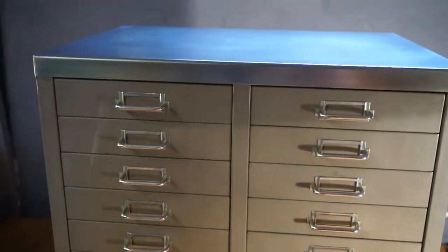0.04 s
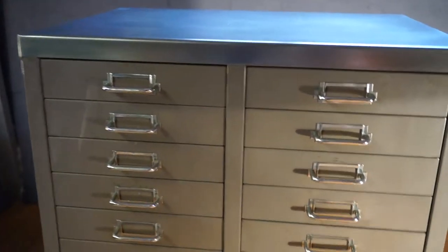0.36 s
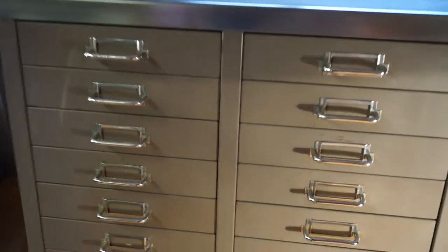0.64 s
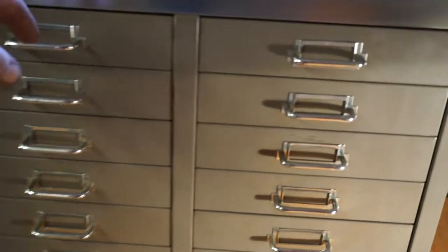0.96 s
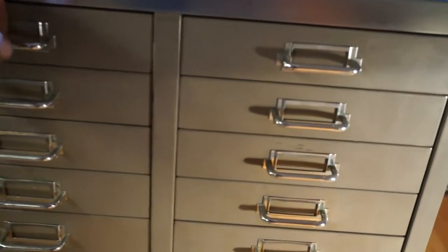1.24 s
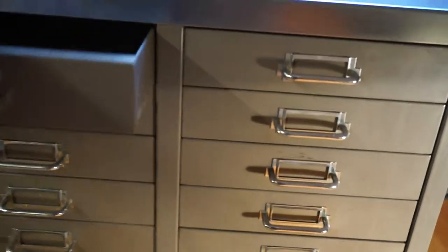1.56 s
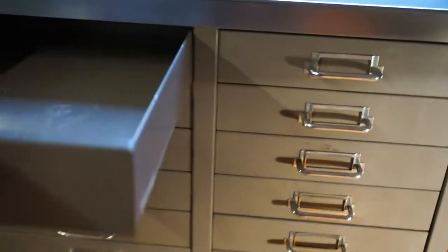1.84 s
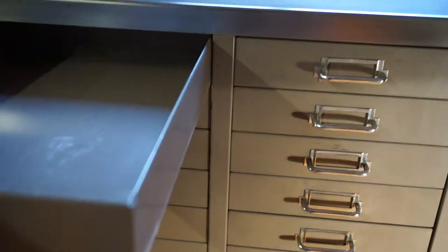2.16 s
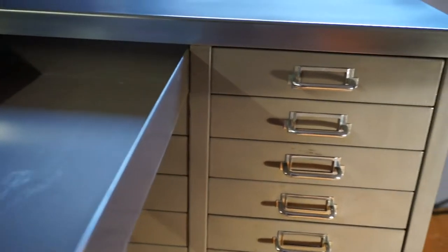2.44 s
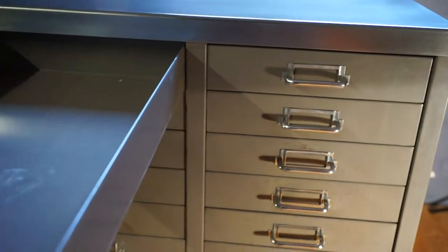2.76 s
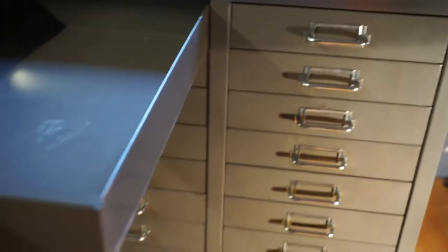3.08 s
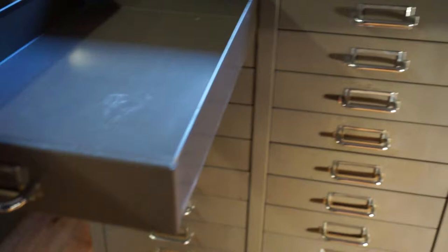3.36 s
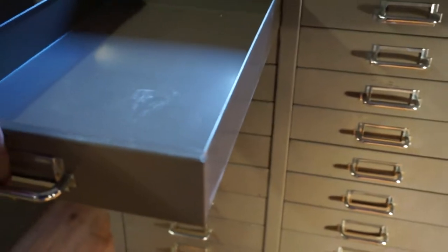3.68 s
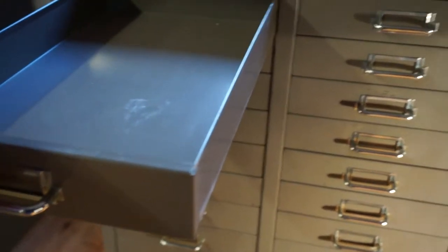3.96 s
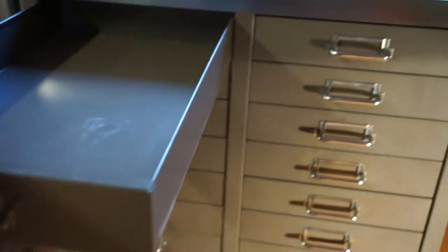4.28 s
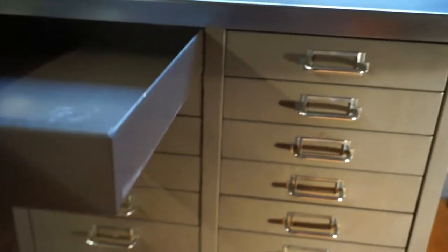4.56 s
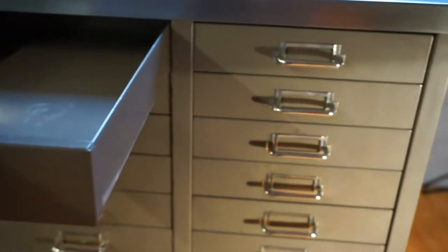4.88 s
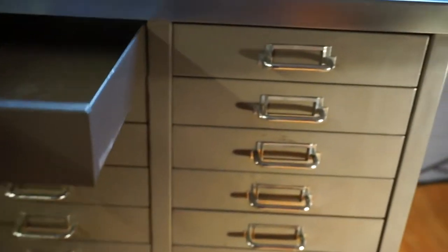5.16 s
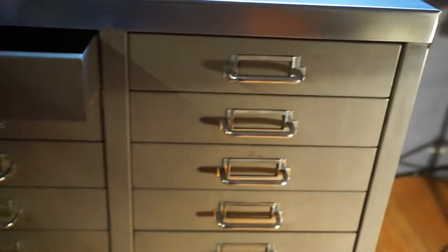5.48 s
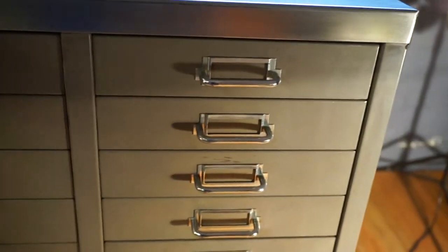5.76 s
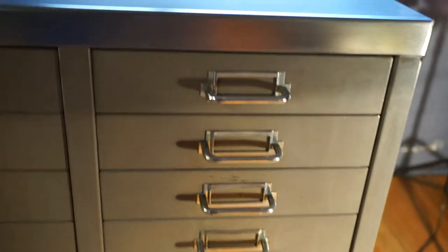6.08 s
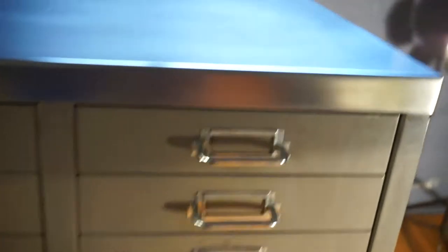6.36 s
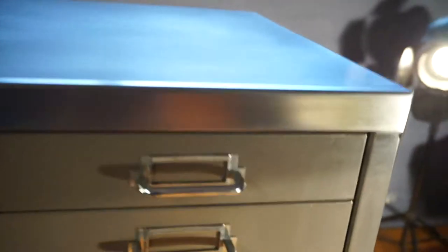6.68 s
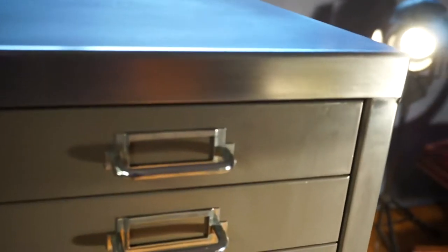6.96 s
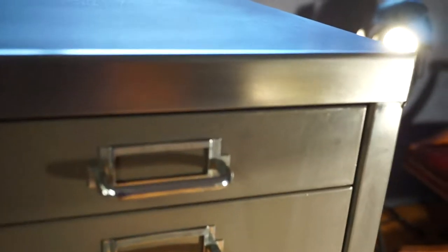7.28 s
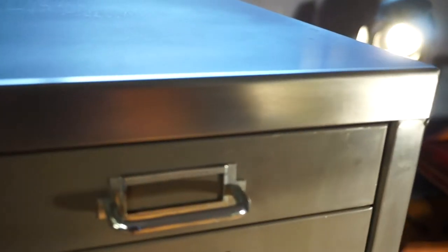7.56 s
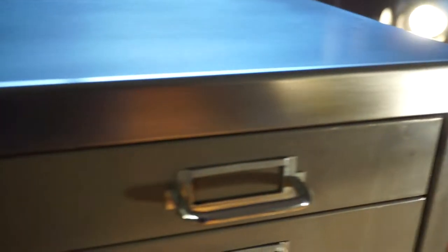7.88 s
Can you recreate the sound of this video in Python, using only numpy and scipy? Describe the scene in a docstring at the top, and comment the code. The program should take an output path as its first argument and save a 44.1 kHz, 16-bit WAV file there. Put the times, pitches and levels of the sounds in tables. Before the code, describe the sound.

Over a faint hush in a small room, fingers tick on a hand-held microphone, and a foot shifts softly on floorboards at about 0.5 seconds. A handle clinks lightly near 1.2 seconds. From 1.4 seconds a shallow steel filing cabinet drawer scrapes open, close and slightly left, juddering around 2 seconds and groaning on its runners. The pull fades with a faint, thin hiss by about 3.2 seconds. After a short pause, the drawer is pushed back from 4.1 seconds, louder now, groaning and catching with several ringing metal knocks between 4.2 and 5.1 seconds. It slides on more smoothly and slams shut at 5.7 seconds with a sharp snap, a hollow thud and a small bounce. The steel rings briefly. Fingers tick and rub on the microphone again near 6.8 seconds, and a very faint distant whirr lingers until about 8 seconds.

```python
"""Over a faint room hush, fingers tick and rub on a hand-held camera, and a foot shifts on floorboards.
A shallow steel drawer is pulled out of a filing cabinet, pushed back, catches and slams home.
Sliding friction and impacts excite the modes of the thin tray, its walls and the hollow cabinet;
stick-slip on the runners makes the tray groan and judder, and the steel rings on in a small room.
A thin hiss is heard as the pull ends. Last, a faint whirr comes up and the fingers tick again."""
import sys
import numpy as np
from scipy import signal
from scipy.fft import rfft, irfft
from scipy.io import wavfile
from scipy.ndimage import uniform_filter1d

SR = 44100
rng = np.random.default_rng(int(sys.argv[2]) if len(sys.argv) > 2 else 0)


def wav_record(signal):
    """Record a signal, one row per channel, as 16-bit PCM in the file named by sys.argv[1]."""
    frames = np.transpose(np.atleast_2d(signal))
    bounded = np.clip(frames, -1, 1)
    # unit amplitude maps onto the largest positive 16-bit level
    quanta = np.round(bounded * 32767).astype(np.int16)
    wavfile.write(sys.argv[1], SR, quanta)


N = 349713
TIME = np.arange(N) / SR
FFT_SIZE = 5 * 2 ** 14
FREQ = np.maximum(np.arange(FFT_SIZE // 2 + 1) * SR / FFT_SIZE, 1)

# broad spectral envelopes of the sources: frequency_hz, gain_db
HUSH_COLOUR = [(15, -25), (25, 0.5), (79, -10), (230, -4.5), (400, -10.5), (826, -14.5), (2800, -18.5),
               (4300, -24), (15500, -29.5)]
CLICK_COLOUR = [(100, -47), (1200, -10), (1700, -11.5), (2100, 1.5), (4000, -0.5), (6500, -10.5),
                (8000, -10.5), (16000, -15)]
DULL_KNOCK_COLOUR = [(60, -9), (200, -2), (1250, -1), (3000, -6), (5000, -26), (15000, -24)]
SKIN_COLOUR = [(100, 13), (1200, -9), (2500, 4), (5000, -1), (11000, -1.5), (16000, -7)]
BOARD_COLOUR = [(40, -40), (130, 3), (350, 6), (1000, -15.5), (10000, -65)]
SOLE_COLOUR = [(100, -17), (700, 5), (2800, -4.5), (5000, -17), (15000, -26)]
FREE_TRAY_COLOUR = [(40, -42.5), (130, -17), (260, -5), (380, -3), (650, 6.5), (820, -4), (1050, 5),
                    (1500, -7), (2150, -7.5), (3300, -34.5), (9000, -52.5), (15000, -46.5)]
SHUT_TRAY_COLOUR = [(40, -35), (130, -10), (300, 3.5), (1000, 3.5), (2000, -12), (3300, -28), (9000, -53)]
WALL_COLOUR = [(60, -27.5), (300, -9.5), (800, -9.5), (1400, 6.5), (2300, 0.5), (3700, -9.5), (5000, -14.5),
               (7000, -17), (9500, -21.5), (13000, -20), (16000, -29.5)]
SHELL_COLOUR = [(25, -28), (50, -20), (75, -6.5), (150, 2.5), (260, 1.5), (400, -3), (700, -12.5),
                (3000, -34), (12000, -70)]
HISS_COLOUR = [(60, -13), (170, 16.5), (700, 13), (1500, 3), (6000, -12), (15000, -14.5)]
# resonance peaks on those envelopes: centre_hz, width_hz, lift_db
CASE_PEAKS = [(2880, 370, 8), (6620, 540, 13.5)]
SKIN_PEAKS = [(6600, 550, 11)]
TRAY_PEAKS = [(308, 53, 15.5), (505, 40, 10), (603.7, 68, 7.5), (723.6, 22, 15), (943, 100, 9.5),
              (1191, 45, 5), (1352, 260, 9.5), (1554, 180, 10.5)]
WALL_PEAKS = [(564, 140, 9), (1057, 60, 12.5), (1401, 140, 9.5), (1660, 42, 4), (2950, 340, 6),
              (4650, 710, 7.5)]  # with the drawer half out
SHELL_PEAKS = [(95.3, 7.9, 9), (141, 19, 6), (166.3, 18, 7.4), (219, 40, 3.5), (295, 66, 6.7)]
HISS_PEAKS = [(4740, 1200, 18.5)]
# freely decaying modes: pitch_hz, t60_s, relative_db
HANDLE_MODES = [(1596, 0.035, 3.5), (2224, 0.06, -3), (4230, 0.012, -4.5)]
TRAY_BOTTOM_MODES = [(304.3, 0.045, -7), (639.5, 0.091, -2), (693, 0.13, 3), (696, 0.066, 1),
                     (790, 0.16, -7), (870, 0.018, -4.5)]
ROCK_MODES = [(93.7, 0.57, 0)]
FRONT_MODES = [(200, 0.022, 0)]
WHIRR_MODES = [(1044, .025, 0)]

# fingers tick on the camera: start_s, click_db, knock_db
FINGER_TICKS = [(.098, -14, -19.5), (0.11, -27, -11.5), (0.160, -31, -34), (0.3145, -11, -53),
                (0.353, -33, -59), (6.727, -41, -59), (6.781, -13, -36), (6.788, -17, -38),
                (6.803, -37, -21)]
# fingers rub on it: peak_s, rise_s, fall_s, level_db
FINGER_RUBS = [(0.101, 0.087, 0.0097, -58.5), (6.746, 0.021, 0.049, -50)]
# a foot shifts: start_s, thump_db, scuff_db, decay_s
FOOT_SHIFTS = [(0.477, -19.5, -56, 0.001), (0.554, -30, -19, 0.019), (0.59, -21.5, -19, 0.086),
               (0.631, -10.5, -33, 0.005), (0.858, -29.5, -36, 0.28)]
# the handle is taken and pulled: start_s, level_db
HANDLE_CLINKS = [(1.14, -31.5), (1.259, -19.5)]
# blows on the drawer: start_s, tray_db, edge_db, snap_over_edge_db, shell_db, decay_s
DRAWER_KNOCKS = [(1.262, -31, -47, 3, -7, 0.08), (4.226, 5, -9.5, 5, -10.5, 0.013),
                 (4.268, -2, -19.5, 9, -1, 0.011), (4.609, 9.5, -1.5, 4, -9.5, 0.0034),
                 (4.632, 8, -3.5, -20.5, 2, 0.016), (4.661, 7, -3, -9.5, -8.5, 0.0042),
                 (4.768, 16.5, 4.5, -20, 2.5, 0.011), (4.987, 9.5, 4, -2, 3.5, 0.008),
                 (5.021, 12.5, 2.5, -4, -7, 0.006), (5.066, 5.5, -7.5, -13, -8.5, 0.0068),
                 (5.734, -10, -9, 16.5, 7, 0.0041), (5.740, 3, -1, -11, 8.5, 0.0086),
                 (5.749, 8.5, 2, -14, 12, 0.012), (5.776, 7.5, -4.5, -16, 10, 0.06)]
# strokes of the hand, out and then in: peak_s, rise_s, fall_s, rub_db, scrape_db, rumble_db
HAND_STROKES = [(1.5, 0.12, 0.098, -35, -39.5, -44), (1.8, 0.32, 0.22, -33, -28.5, -44),
                (1.81, 0.071, 0.026, -28, -39, -47), (2.38, 0.41, 0.18, -35.5, -45, -50),
                (4.11, 0.04, 0.075, -46, -65, -60), (4.21, 0.12, 0.13, -33, -48.5, -42),
                (4.74, 0.25, 0.12, -30, -41, -34), (5.11, 0.13, 0.18, -30, -46.5, -37),
                (5.42, 0.36, 0.33, -39, -37.5, -46)]
# how far the drawer is out: time_s, travel_share
DRAWER_TRAVEL = [(1.35, 0), (2.0, .7), (2.7, 1), (4.15, 1), (5.734, 0)]
# slow runners bow the tray: peak_s, rise_s, fall_s, hum_db, tone_db, pitch_hz
TRAY_GROANS = [(1.52, .07, 0.035, -59, -39, 714.4), (2.01, 0.044, 0.13, -46.5, -36.5, 722),
               (2.4, 0.26, 0.14, -44, -39.5, 691), (2.73, 0.2, .16, -66, -56.5, 673),
               (4.17, .12, .06, -39.5, -42.5, 731), (4.459, 0.042, 0.14, -33.5, -36.5, 719.8),
               (4.645, .04, .04, -31, -26, 709.5), (4.725, .03, 0.027, -25, -29.5, 696),
               (5.0, 0.02, 0.033, -23, -44, 712), (5.5, .07, 0.074, -65.5, -40, 723)]
# a dry runner catches: start_s, level_db, decay_s
RUNNER_JUDDERS = [(1.908, 4, 0.0075), (1.967, 8, 0.012), (2.025, -4.5, 0.059), (4.144, -1, 0.03),
                  (4.432, -2.5, .04), (4.526, 1.5, 0.018), (4.585, 3.5, 0.016), (4.63, 8, 0.022),
                  (4.717, 2.5, 0.021)]
# swells of a faint hiss as the pull ends: peak_s, rise_s, fall_s, level_db
FAINT_HISS = [(2.5, 0.24, 0.15, -52.5), (2.8, 0.56, 0.16, -55), (3.19, 0.36, 0.083, -63)]
# the cabinet rocks on the floor: start_s, level_db
CABINET_ROCKS = [(4.29, -6), (4.86, -9)]
# the drawer front hits the frame and bounces: start_s, level_db
FRONT_SLAMS = [(5.734, 4), (5.749, 2.5), (5.853, -2)]
# ring time of the steel in the room: frequency_hz, t60_s
RING_TIMES = [(90, 2.44), (290, 1.38), (520, 0.92), (1100, 0.59), (3000, 0.68), (15000, 0.28)]
# the cabinet stands to the left: frequency_hz, left_over_right_db, side_over_mid_db
STEREO_IMAGE = [(100, .3, -31), (350, .9, -21), (700, 2, -16), (1300, 4.8, -7), (5000, 4.5, -2),
                (9000, .5, -3), (13000, -2, -3)]


def undb(db):
    """Amplitude ratio of a level in decibels."""
    return 10 ** (np.asarray(db) / 20)


def curve(table, hz=FREQ, column=1):
    """Interpolation of one column on a logarithmic frequency axis."""
    rows = np.array(table)
    return np.interp(np.log(hz), np.log(rows[:, 0]), rows[:, column])


def minimum_phase(db):
    """Causality: a spectrum with these gains in which nothing sounds before its cause."""
    cepstrum = irfft(np.log(undb(db)))
    cepstrum[1:FFT_SIZE // 2] *= 2
    cepstrum[FFT_SIZE // 2 + 1:] = 0
    return np.exp(rfft(cepstrum))


def body(colour, peaks=()):
    """Resonance: a unit-energy impulse response whose broad envelope is lifted by peaks."""
    lifts_db = sum(lift / (1 + (2 * (FREQ - hz) / width) ** 2) for hz, width, lift in peaks)
    response = irfft(minimum_phase(curve(colour) + lifts_db))
    return response / np.linalg.norm(response)


def ringing(modes):
    """Modal superposition: damped cosines add to a unit-energy impulse response."""
    t = np.arange(FFT_SIZE // 2) / SR
    response = sum(undb(db - 60 * t / t60) * np.cos(2 * np.pi * hz * t) for hz, t60, db in modes)
    return response / np.linalg.norm(response)


def through(x, response):
    """Convolution of an excitation with an impulse response, channel by channel."""
    return signal.fftconvolve(np.atleast_2d(x), np.atleast_2d(response), axes=1)[:, :N]


def filtered(x, order, cutoff_hz, kind="low"):
    """Maximally flat low-pass or high-pass filtering."""
    return signal.sosfilt(signal.butter(order, cutoff_hz, kind, fs=SR, output="sos"), x)


def wander(rate_hz):
    """Band-limited random fluctuation with a spread near 1."""
    knots = rng.standard_normal(4096)
    fine = signal.resample(knots, 8 * len(knots))
    return np.interp(8 * TIME * rate_hz, np.arange(len(fine)), fine)


def swell(peak_s, rise_s, fall_s, db):
    """Asymmetric bell envelope, 10 dB down at rise_s before its peak and fall_s after it."""
    away = (TIME - peak_s) / np.where(TIME < peak_s, rise_s, fall_s)
    return undb(db - 10 * np.minimum(away ** 2, 20))


def shot_noise(pulses_per_s, spread_db, flutter_hz, flutter_db):
    """Shot noise: random, uneven impulses whose level flutters; in friction, each is one tiny slip."""
    pulses = (rng.random(N) < pulses_per_s / SR) * rng.choice([-1, 1], N)
    pulses = pulses * undb(spread_db * rng.standard_normal(N))
    pulses *= undb(flutter_db * wander(flutter_hz))
    return pulses / np.std(pulses)


def blows(starts_s, levels_db, decays_s, contact):
    """Impact forces: an impulse, weighted by contact, and then an exponentially dying rattle."""
    force = np.zeros(N + FFT_SIZE)
    t = np.arange(FFT_SIZE // 8) / SR
    for start_s, db, decay_s in zip(starts_s, levels_db, decays_s):
        push = rng.standard_normal(len(t)) * np.exp(-t / decay_s)
        push /= np.linalg.norm(push)
        push[0] += contact
        start = int(start_s * SR)
        force[start:start + len(t)] += undb(db) * push / np.linalg.norm(push)
    return force[:N]


def struck(events, modes):
    """Free vibration after clean blows, softened from an octave above the highest mode."""
    start_s, db = np.transpose(events)
    taps = np.zeros(N)
    taps[(start_s * SR).astype(int)] = undb(db)
    return through(filtered(taps, 2, 2 * modes[-1][0]), ringing(modes))


def room_hush(level_db=-66.5, coherent_below_hz=217):
    """Diffuse field: faint room noise, alike on both sides in the bass only."""
    mid, side = through(rng.standard_normal((2, N)), body(HUSH_COLOUR))
    side = filtered(side, 1, coherent_below_hz, "high")
    return np.array([mid + side, mid - side]) * undb(level_db + 0.31 * wander(0.19))


def fingers(pan_db=8, decay_s=0.002):
    """Structure-borne sound: ticks and squeaky rubs on the camera's case, near the left microphone."""
    start_s, click_db, knock_db = np.transpose(FINGER_TICKS)
    decays_s = np.full(len(start_s), decay_s)
    touch = sum(swell(*rub) for rub in FINGER_RUBS)
    channels = []
    for side in (1, -1):
        taps = blows(start_s, click_db, decays_s, contact=side * 0.69)
        clicks = through(taps, body(CLICK_COLOUR, CASE_PEAKS))
        slips = shot_noise(6000, spread_db=4, flutter_hz=200, flutter_db=2)
        squeaks = through(touch * slips, body(SKIN_COLOUR, SKIN_PEAKS))
        knocks = through(blows(start_s, knock_db, 2 * decays_s, contact=0.27), body(DULL_KNOCK_COLOUR))
        channels.append((clicks + squeaks) * undb(side * pan_db / 2) + knocks)
    return np.vstack(channels)


def foot():
    """Impact and friction: the floorboards thump softly as a sole scuffs them."""
    start_s, thump_db, scuff_db, decay_s = np.transpose(FOOT_SHIFTS)
    thumps = through(blows(start_s, thump_db, decay_s, contact=0.47), body(BOARD_COLOUR))
    scuffs = through(blows(start_s, scuff_db, decay_s, contact=0.19), body(SOLE_COLOUR))
    return thumps + scuffs


def handle():
    """Modal ringing: the handle clinks as it is taken and pulled."""
    return struck(HANDLE_CLINKS, HANDLE_MODES)


def knocking(snap_hz=6360):
    """Impact forces on tray, edge and shell; bare steel on steel gives the snap above snap_hz."""
    start_s, tray_db, edge_db, snap_db, shell_db, decay_s = np.transpose(DRAWER_KNOCKS)
    edge = filtered(blows(start_s, edge_db, decay_s, contact=0.53), 3, snap_hz)
    snap = filtered(blows(start_s, edge_db + snap_db, decay_s, contact=0.36), 3, snap_hz, "high")
    tray = blows(start_s, tray_db, decay_s, contact=0.27)
    shell = blows(start_s, shell_db, decay_s, contact=0.99)
    return np.array([tray, edge + snap, shell])


def sliding(chatter_hz=77, chatter_db=4.5, grip_hz=14, grip_db=1.23, rumble_lag_s=0.053):
    """Sliding friction: unevenly gripping runners rub the tray, scrape its edge and shake the shell."""
    strokes = [[swell(s, rise, fall, rub_db), swell(s, rise, fall, scrape_db),
                swell(s + rumble_lag_s, rise, fall, rumble_db)]
               for s, rise, fall, rub_db, scrape_db, rumble_db in HAND_STROKES]
    rub, scrape, rumble = np.linalg.norm(strokes, axis=0)  # overlapping strokes add in power
    cycles = np.cumsum(chatter_hz * (1 + .12 * wander(grip_hz))) / SR
    chatter = undb(chatter_db * (1 - 2 * (cycles % 1)))  # each slip starts hard and dies away
    grip = undb(grip_db * wander(grip_hz)) * chatter / np.sqrt(np.mean(chatter ** 2))
    tray = rub * shot_noise(2500, spread_db=6, flutter_hz=69.3, flutter_db=0)
    edge = scrape * shot_noise(7000, spread_db=5.5, flutter_hz=93.36, flutter_db=2.5)
    shell = rumble * shot_noise(1500, spread_db=0.5, flutter_hz=31.4, flutter_db=4)
    return grip * np.array([tray, edge, shell])


def drawer(positions=5, free_travel=0.38, wall_rise=0.092):
    """Forced vibration of tray, walls and shell; inside free_travel the cabinet damps tray and walls."""
    tray, edge, shell = sliding() + knocking()
    travel = np.interp(TIME, *np.transpose(DRAWER_TRAVEL))
    free = np.clip(travel / free_travel, 0, 1)
    sound = through(tray * free, body(FREE_TRAY_COLOUR, TRAY_PEAKS))
    sound += through(tray * (1 - free), body(SHUT_TRAY_COLOUR))
    for place in np.linspace(0, 1, positions):
        crossfade = np.maximum(1 - abs(travel - place) * (positions - 1), 0)
        lift_share = np.interp(place, [0, free_travel], [.6, 1])
        tuning = 1 + wall_rise * (place - .5)  # the wall modes rise as the drawer comes out
        peaks = [(hz * tuning, width, lift_share * lift) for hz, width, lift in WALL_PEAKS]
        sound += through(edge * crossfade, body(WALL_COLOUR, peaks))
    return sound + through(shell, body(SHELL_COLOUR, SHELL_PEAKS))


def bowed(hz, wander_share=.045, flutter_db=5, flutter_hz=95):
    """Self-sustained oscillation: stick-slip holds one tone whose pitch and strength flutter."""
    cycles = np.cumsum(hz * (1 + wander_share * wander(flutter_hz))) / SR
    tone = np.sin(2 * np.pi * cycles) * undb(flutter_db * wander(flutter_hz))
    return tone / np.std(tone)


def groan(hum_hz=309):
    """Frictional bowing: at a crawl the tray hums in its lowest mode and sings a gliding tone."""
    hum = sum(swell(s, rise, fall, db) for s, rise, fall, db, _, _ in TRAY_GROANS)
    tone = sum(swell(s, rise, fall, db) for s, rise, fall, _, db, _ in TRAY_GROANS)
    peak_s, *_, pitch_hz = np.transpose(TRAY_GROANS)
    return hum * bowed(hum_hz) + tone * bowed(np.interp(TIME, peak_s, pitch_hz))


def judder(slip_hz=69.82, gap_spread=.2, spread_db=2, count=24):
    """Stick-slip: each catch sets off a dying train of uneven jerks that ring the tray bottom."""
    jerks = np.zeros(N)
    for start_s, db, decay_s in RUNNER_JUDDERS:
        gaps, sizes = rng.standard_normal((2, count))
        delays_s = np.cumsum(np.exp(gap_spread * gaps) / slip_hz)
        delays_s -= delays_s[0]
        strengths = undb(db - spread_db * sizes) * np.exp(-delays_s / decay_s)
        jerks[((start_s + delays_s) * SR).astype(int)] += strengths
    softened = filtered(jerks, 2, cutoff_hz=1260)  # a slip takes a moment
    return through(softened, ringing(TRAY_BOTTOM_MODES))


def faint_hiss():
    """Filtered noise: a faint, thin, breath-like hiss near 5 kHz as the pull ends."""
    noise = shot_noise(12000, spread_db=2, flutter_hz=90, flutter_db=1)
    envelope = np.linalg.norm([swell(*row) for row in FAINT_HISS], axis=0)
    return through(envelope * noise, body(HISS_COLOUR, HISS_PEAKS))


def cabinet_bass(hum_hz=177.6):
    """Low modes of the cabinet: it hums briefly while the drawer rests, rocks, and takes the slam."""
    envelope = swell(peak_s=3.43, rise_s=.08, fall_s=.11, db=-65)
    hum = envelope * np.sqrt(2) * np.sin(2 * np.pi * hum_hz * TIME)
    return hum + struck(CABINET_ROCKS, ROCK_MODES) + struck(FRONT_SLAMS, FRONT_MODES)


def whirr():
    """Narrow-band noise: a faint, distant whirr comes up once the cabinet is still."""
    envelope = swell(peak_s=7.6, rise_s=1.16, fall_s=7, db=-71.5)
    return through(envelope * rng.standard_normal((2, N)), ringing(WHIRR_MODES))


def whitened(response):
    """Whitening: the spectrum of a response, levelled to the same power density in every band."""
    spectrum = rfft(response)
    return spectrum / np.sqrt(uniform_filter1d(abs(spectrum) ** 2, size=37))


def steel_reverberation(early_t60_s=0.15, late_db=-7.5, direct_db=-4.5):
    """Modal overlap: after the direct sound, countless sheet modes give a quick decay and a long ring."""
    t = np.arange(FFT_SIZE) / SR
    early = whitened(rng.standard_normal((2, FFT_SIZE)) * 1000 ** (-t / early_t60_s))
    early[0] += undb(direct_db)
    noise = rfft(rng.standard_normal((2, FFT_SIZE)))
    centres_hz = np.geomspace(60, 16000, 12)
    late = 0
    for share, t60 in zip(np.eye(len(centres_hz)), curve(RING_TIMES, centres_hz)):
        band = irfft(noise * np.interp(np.log(FREQ), np.log(centres_hz), share))
        late = late + band * 1000 ** (-t / t60)
    late_gain = undb(late_db) * np.sqrt(curve(RING_TIMES))  # a longer ring stores more energy
    mid, side = (whitened(irfft(early)) + late_gain * whitened(late)) / np.sqrt(1 + late_gain ** 2)
    side = side * minimum_phase(curve(STEREO_IMAGE, column=2))
    pan = undb(curve(STEREO_IMAGE) / 2)
    left, right = irfft(np.array([(mid + side) * pan, (mid - side) / pan]))[:, :-FFT_SIZE // 4]
    return np.array([left, np.pad(right, (2, 0))[:-2]])  # the right ear hears it a little later


def scene(send_db=-17.5):
    """Superposition: drawer, hiss and foot reverberate; fingers and cabinet bass are nearly dry."""
    space = steel_reverberation()
    close = fingers() + cabinet_bass()
    distant = handle() + drawer() + faint_hiss() + judder() + groan() + foot()
    return through(distant + undb(send_db) * close, space) + close + room_hush() + whirr()


def record(dry, top_hz=15800):
    """Band limiting: a steep elliptic low-pass removes the highest treble."""
    return signal.sosfilt(signal.ellip(10, .2, 70, top_hz, fs=SR, output="sos"), dry)


dry = scene()
out = record(dry)
wav_record(out)
```